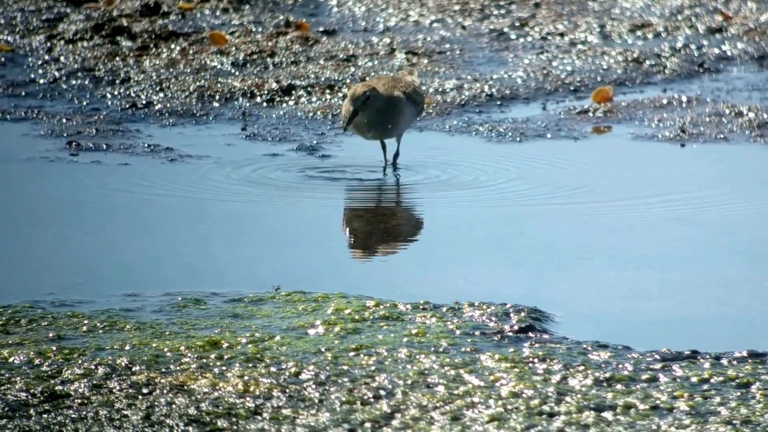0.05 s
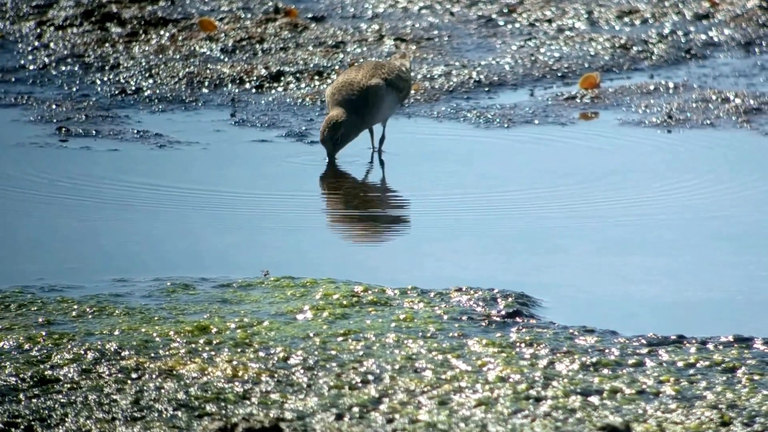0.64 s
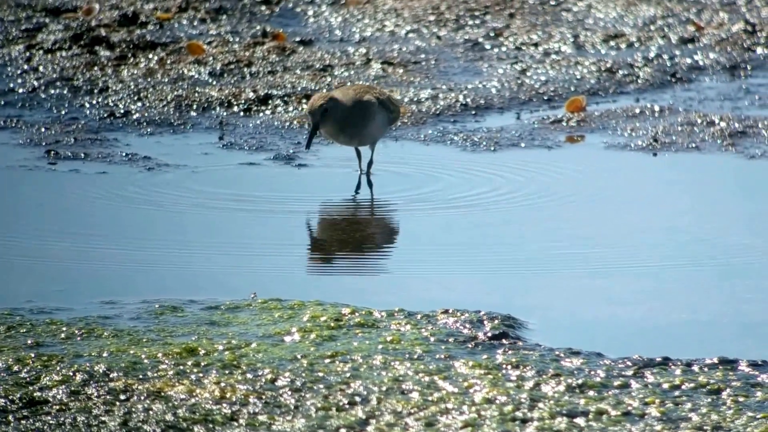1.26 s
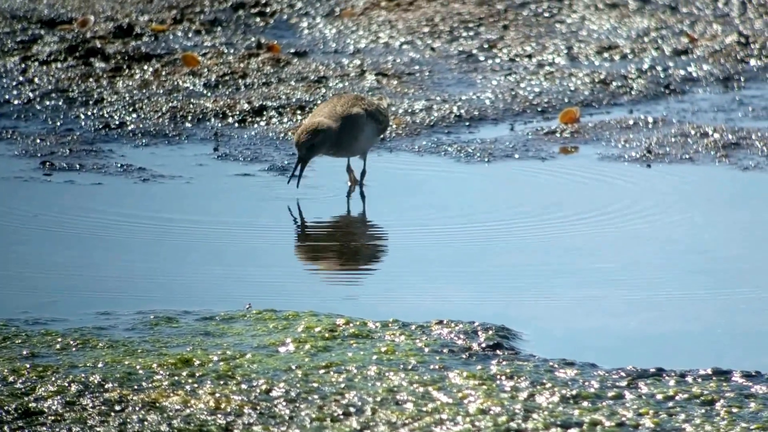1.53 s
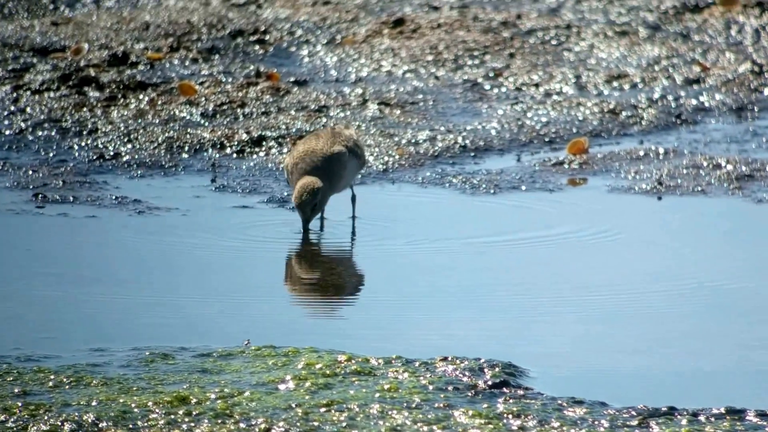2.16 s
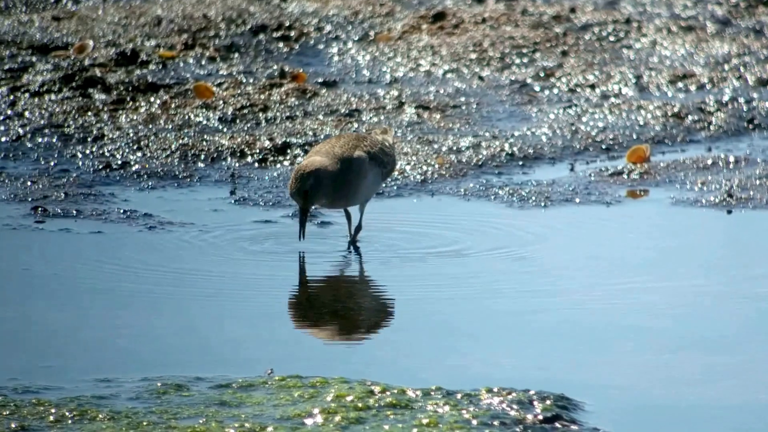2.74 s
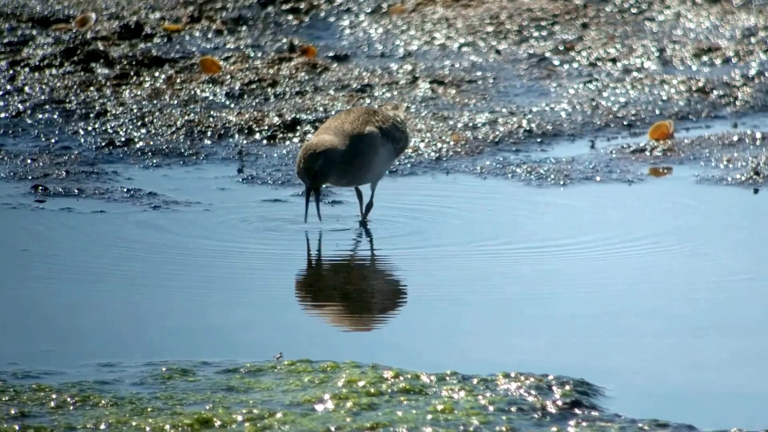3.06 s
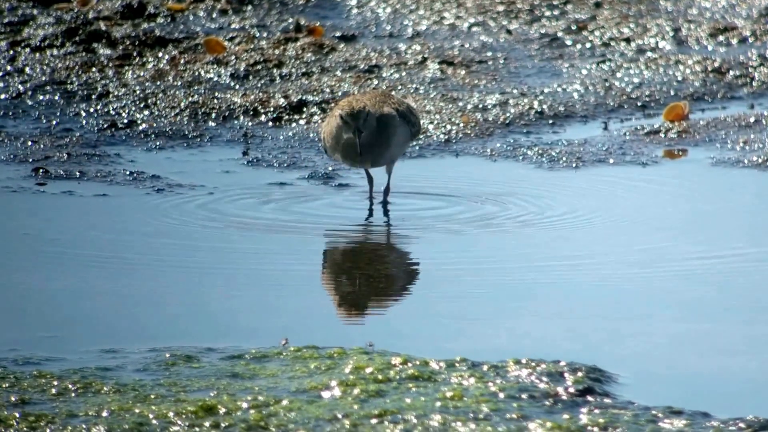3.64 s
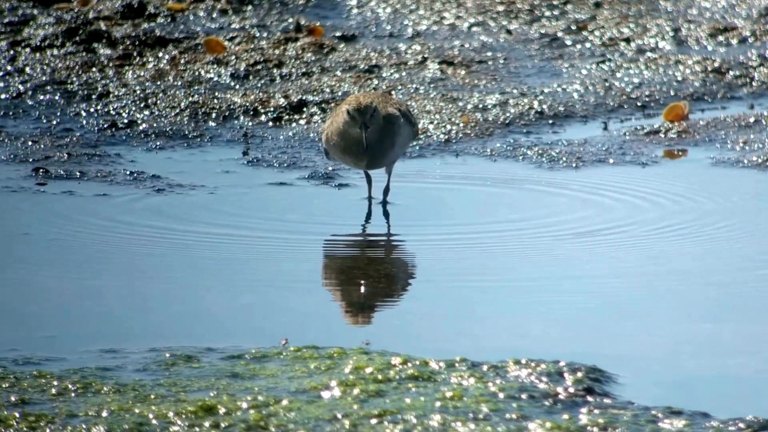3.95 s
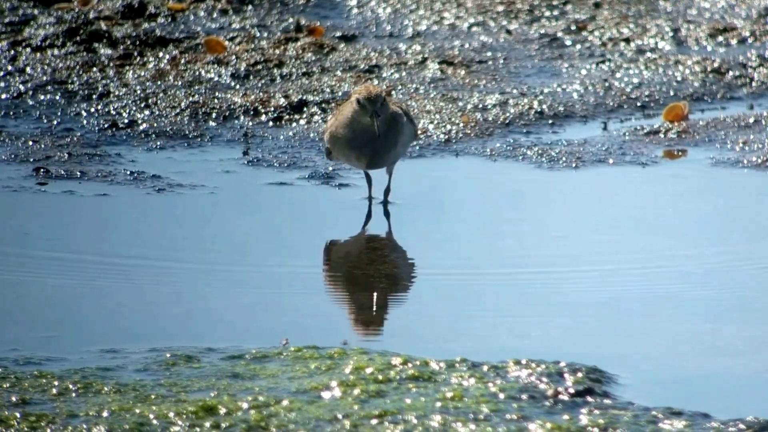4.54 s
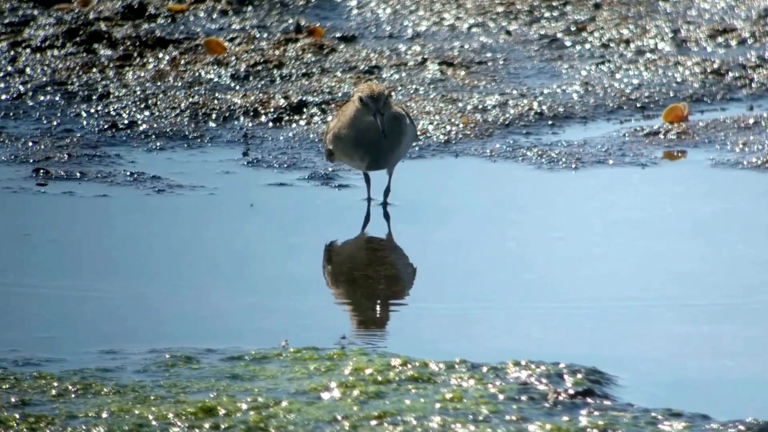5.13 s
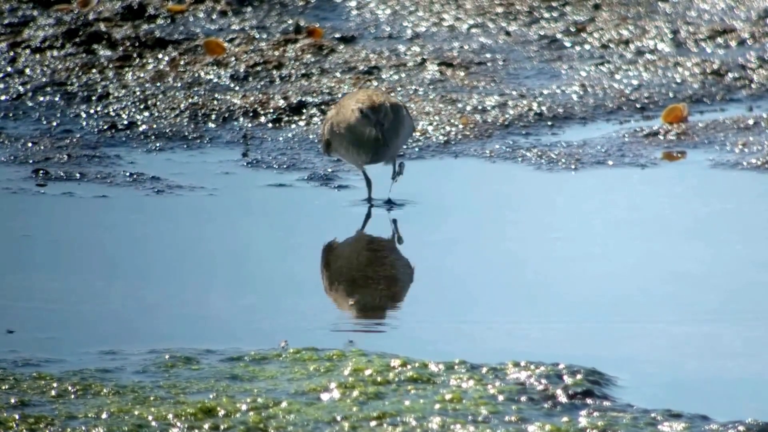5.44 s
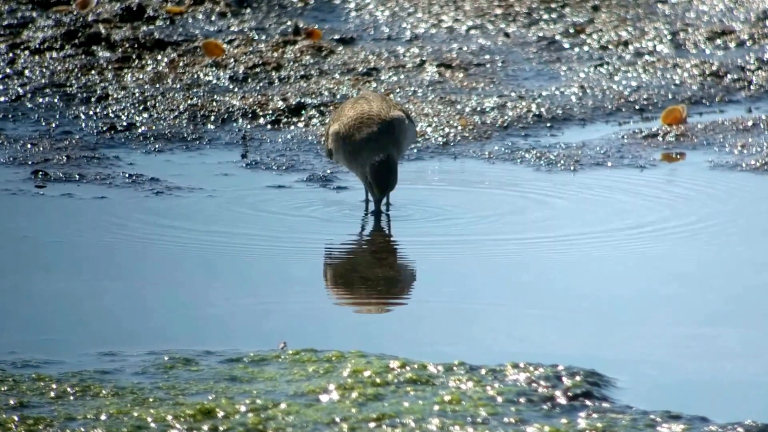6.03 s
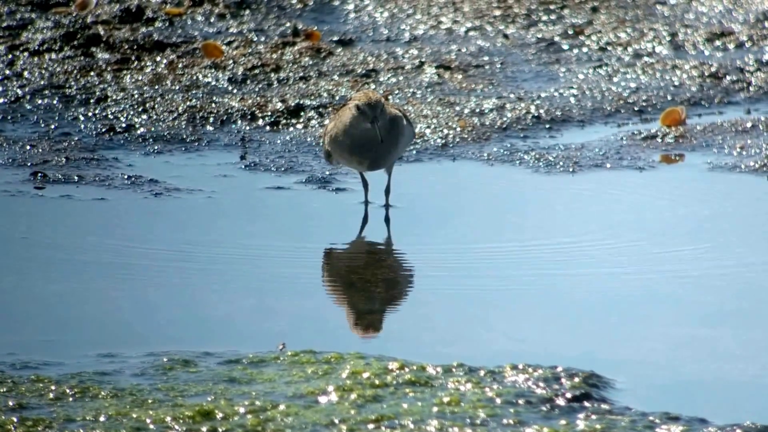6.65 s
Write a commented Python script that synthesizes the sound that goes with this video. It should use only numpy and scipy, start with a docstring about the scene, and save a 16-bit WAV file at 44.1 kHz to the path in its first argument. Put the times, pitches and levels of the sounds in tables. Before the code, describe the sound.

Quiet ambience at a shallow waterside near a road, heard through a small microphone with a light hiss. At first a car's tyres fade away under thin, dry grasshopper chirps, a few dull knocks and sharp little clicks. Brief swishes of clothing follow, over faint insects and far traffic. In the last seconds a second car swells closer, its exhaust droning and its tyres sounding slightly hollow.

```python
"""A muddy shore near a road, with far traffic rumbling and insects shimmering faintly throughout.
At first a car drives off while a grasshopper rasps with its legs, among soft bumps and a few ticks.
Then a sleeve swishes now and then, and the grasshopper adds four longer strokes. Another car draws
near and is loudest at the end, its exhaust droning, its tyre noise hollowed by the ground reflection.
All of it reaches a small microphone that rings near 8 kHz."""
import sys
import numpy as np
from scipy import signal
from scipy.fft import rfft, irfft
from scipy.io import wavfile
from scipy.ndimage import map_coordinates

SR = 44100
rng = np.random.default_rng(int(sys.argv[2]) if len(sys.argv) > 2 else 0)


def transcribe(u):
    """Save the signal u as a 16-bit wav file named by the first command-line argument.

    u: samples, shape (n,) or (channels, n), limited to [-1, 1]; the rate is SR.
    q: integer samples, one column per channel.
    """
    v = np.clip(np.atleast_2d(u).T, -1, 1)
    q = np.round(v * 32767).astype(np.int16)
    wavfile.write(sys.argv[1], SR, q)


N = 299439
TIME = np.arange(N) / SR


def from_db(db):
    """Decibels to gain."""
    return 10 ** (np.asarray(db) / 20)


def unit_power(x):
    """Scale to unit power."""
    return x / np.sqrt(np.mean(x ** 2) + 1e-20)


def curve(rows):
    """Join (seconds, value) points with straight lines, at every sample."""
    return np.interp(TIME, *np.transpose(rows))


def since(s):
    """Seconds gone by after a moment, zero before it."""
    return np.maximum(TIME - s, 0)


def swell(peak_s, length_s):
    """A smooth rise and fall of height 1 around a moment."""
    return np.exp(-(2 * (TIME - peak_s) / length_s) ** 2)


def drift(rate_hz):
    """Slow random wander of spread 1."""
    hz = np.fft.rfftfreq(N, 1 / SR)
    return unit_power(irfft(rfft(rng.standard_normal(N)) / (1 + (hz / rate_hz) ** 4), N))


def flutter(depth_db, rate_hz):
    """A gain that wavers at random."""
    return from_db(depth_db * drift(rate_hz))


def noise(colour):
    """Noise of unit power with the given colour, falling steeply past both ends."""
    hz = np.fft.rfftfreq(N, 1 / SR) + 1e-3
    points_hz, level_db = np.transpose(colour)
    gain = from_db(np.interp(np.log(hz), np.log(points_hz), level_db))
    gain *= np.minimum(1, hz / points_hz[0]) ** 2 * np.minimum(1, points_hz[-1] / hz) ** 2
    return unit_power(irfft(rfft(rng.standard_normal(N)) * gain, N))


def sliding_noise(colour, ratio):
    """Noise whose peaks and notches slide by a ratio, as a changing ground reflection makes them."""
    position = np.cumsum(ratio) % (N - 1)
    return map_coordinates(noise(colour), [position], order=3, mode="wrap")


def passing(loudest_s, half_width_s, db, loss_db):
    """Gain of a source driving by on a straight road, losing loss_db per tenfold distance."""
    distance = np.hypot(1, (TIME - loudest_s) / half_width_s)
    return from_db(db - loss_db * np.log10(distance))


def notch(x, centre_hz, depth, width_hz):
    """Cancel a share of the band around a moving centre."""
    carrier = np.exp(2j * np.pi * np.cumsum(centre_hz) / SR)
    band = signal.sosfiltfilt(signal.butter(1, width_hz / 2, fs=SR, output="sos"), x / carrier)
    return x - np.clip(depth, 0, 1) * 2 * np.real(band * carrier)


# A nearly flat hiss. Each row: frequency in Hz, relative level in dB.
HISS_COLOUR = [(500, -2), (2000, -3), (3200, -5), (4500, -8), (6000, -7), (7200, -4), (8200, -6),
               (10000, -4.5), (13000, -5.5), (15700, -6.5)]

def noise_floor(whine_hz=15000):
    """A steady faint hiss and the thin whine of the camera."""
    hiss = from_db(-62.8) * noise(HISS_COLOUR) * flutter(depth_db=.45, rate_hz=50)
    whine = from_db(-88) * np.sin(2 * np.pi * whine_hz * TIME)
    return hiss + whine


# The ebb and flow of the far insects. Each row: time in seconds, level in dB.
CHORUS_LEVEL = [(0, -70.5), (1.8, -64), (2.85, -60), (3.1, -69.5), (4.9, -62.5), (5.7, -77), (6.5, -64.5)]
# Their high sheen. Each row: frequency in Hz, relative level in dB.
CHORUS_COLOUR = [(3000, -28), (5500, -5), (6600, -7), (7300, -1.5), (8000, -1), (8800, -8.5), (9700, -8),
                 (11000, -21), (14000, -22)]

def insect_chorus():
    """Many far insects blur into one shimmering band."""
    return from_db(curve(CHORUS_LEVEL)) * noise(CHORUS_COLOUR) * flutter(depth_db=2.14, rate_hz=39)


# A thin, dry rasp. Each row: frequency in Hz, relative level in dB.
RASP_COLOUR = [(6000, -16), (7400, -7.5), (8100, 3), (8600, -1), (9100, -5), (9800, -12), (12000, -17),
               (15000, -22)]
# The longer single strokes. Each row: peak time in seconds, length in seconds, level in dB.
LONG_STROKES = [(4.474, 0.13, -57.5), (4.616, 0.13, -54.5), (5.28, 0.15, -62.5), (5.455, 0.33, -61.5)]

def grasshopper(gap_s=.1285, gap_shrink_s=.0016, stroke_s=.058, tooth_hz=130):
    """Each chirp is one leg stroke; the opening run quickens a little and swells towards its middle."""
    stroke = np.arange(15)
    times = .272 + stroke * (gap_s - gap_shrink_s * stroke / 2)
    run = [(s, stroke_s, -62.5 - 3.5 * abs(s - 1.17)) for s in times]
    envelope = sum(from_db(db) * swell(s, length) for s, length, db in run + LONG_STROKES)
    return envelope * noise(RASP_COLOUR) * flutter(depth_db=3.5, rate_hz=tooth_hz)


# Soft knocks. Each row: start in seconds, level in dB, decay in seconds.
BUMPS = [(0.113, -46.5, .012), (.687, -49.5, 0.05), (1.907, -41, 0.0073)]
# Their muffled thud. Each row: frequency in Hz, relative level in dB.
BUMP_COLOUR = [(120, -4), (230, -0.5), (380, -6.5), (560, -5.5), (900, -16), (2000, -31)]

def bumps():
    """Dull, quickly damped knocks on the camera body."""
    envelope = sum(from_db(db) * (TIME > s) * np.exp(-since(s) / decay) for s, db, decay in BUMPS)
    return envelope * noise(BUMP_COLOUR)


# Sharp little clicks. Each row: start in seconds, strength of the contact in dB.
TICKS = [(0.687, -30.5), (.733, -54), (.933, -46), (3.585, -50), (4.547, -38)]
# Their bright ring. Each row: frequency in Hz, relative level in dB, seconds to fall by 60 dB.
TICK_MODES = [(4060, -13, 0.0037), (5680, -11, 0.0068), (7700, -6, 0.0018), (8660, 0, 0.0021),
              (10600, -3, 0.0015)]

def ticks():
    """Tiny hard contacts, each dead within a few milliseconds."""
    age = TIME[:SR // 50]
    ring = sum(from_db(db - 60 * age / t60) * np.sin(2 * np.pi * hz * age) for hz, db, t60 in TICK_MODES)
    contacts = np.zeros(N)
    for s, db in TICKS:
        contacts[round(s * SR)] = from_db(db)
    return signal.fftconvolve(contacts, ring)[:N]


# Crisp cloth friction. Each row: frequency in Hz, relative level in dB.
CLOTH_COLOUR = [(1200, -6), (2200, -1), (3000, -8), (4100, 4.5), (4800, -2), (5600, -1), (7500, -3.5),
                (9000, -4), (11000, -7), (15000, -15)]
# Sleeve strokes. Each row: start, fastest moment and end in seconds, gain in dB,
# rise and fade in seconds, low and high band edge in Hz.
SWISHES = [(1.72, 1.875, 1.95, -56.5, 0.062, 0.043, 3900, 11000),
           (3.18, 3.338, 3.375, -43.5, 0.06, 0.015, 1500, 13500),
           (3.35, 3.48, 3.6, -59, .8, .8, 3400, 11000), (4.346, 4.5, 4.7, -58.5, 0.35, 0.73, 3300, 9200),
           (4.524, 4.625, 4.71, -47, 0.066, 0.069, 4270, 8100)]

def sleeve(edge_s=.0084):
    """Cloth slides faster, then stops; the weave catches and makes the hiss grainy."""
    out = np.zeros(N)
    for start, fastest, end, db, rise, fade, low_hz, high_hz in SWISHES:
        speed = np.exp(-np.maximum((fastest - TIME) / rise, (TIME - fastest) / fade))
        contact = np.clip(np.minimum(TIME - start, end - TIME) / edge_s, 0, 1)
        band = signal.butter(3, [low_hz, high_hz], "band", fs=SR, output="sos")
        friction = signal.sosfilt(band, noise(CLOTH_COLOUR))
        out += from_db(db) * speed * contact * friction
    return out * flutter(depth_db=1.5, rate_hz=370)


# The road bed: deep rumble, body roar and tyre hum. Each row: frequency in Hz, relative level in dB.
RUMBLE_COLOUR = [(20, -15), (32, -20), (42, -7), (50, 3.5), (65, 4.5), (80, -3.5), (100, -1), (130, -7),
                 (170, -12.5), (230, -22.5), (400, -29)]
ROAR_COLOUR = [(70, -28), (120, -2.5), (180, 1.5), (250, 1), (340, -0.5), (470, 2.5), (640, -2.5), (820, 0),
               (1100, -11.5), (1500, -14)]
HUM_COLOUR = [(350, -24), (580, -12.5), (740, -2.5), (900, -0.5), (1100, 1), (1250, -5), (1500, -8.5),
              (1750, -12), (2200, -21), (3150, -17.5), (3700, -25.5), (4200, -28.5), (4700, -30),
              (5200, -34), (8000, -40.5)]
LEAVE_S = 1.42   # the leaving car's tyres hold their level until here

def traffic():
    """The far road and both cars add up to rumble, roar and hum, wavering in the moving air."""
    def layer(colour, far_db, leaving_db, nearing):
        power = from_db(far_db) ** 2 + from_db(leaving_db) ** 2 + nearing ** 2
        return np.sqrt(power) * noise(colour)

    low_fade_db, hum_fade_db = 3 * TIME, 5.5 * since(LEAVE_S)
    # Each part of the nearing car beams at the shore at its own moment.
    rumble = layer(RUMBLE_COLOUR, far_db=-54.5, leaving_db=-48 - low_fade_db,
                   nearing=passing(7, 1.4, db=-41.5, loss_db=23))
    roar = layer(ROAR_COLOUR, far_db=-65, leaving_db=-58.5 - low_fade_db,
                 nearing=passing(6.5, .7, db=-41.5, loss_db=36))
    hum = layer(HUM_COLOUR, far_db=-56.5, leaving_db=-49.5 - hum_fade_db,
                nearing=passing(6, .6654, db=-43, loss_db=25))
    return rumble * flutter(depth_db=.5, rate_hz=6.4) + roar + hum * flutter(depth_db=.6, rate_hz=11.5)


# The leaving car's tread noise. Each row: frequency in Hz, relative level in dB.
LEAVING_TREAD_COLOUR = [(350, -30), (520, -3), (750, -30), (1100, 0), (1350, 5), (1700, 0), (2150, -10),
                        (2550, -6), (2900, -10), (3200, -11), (3700, -38)]

def leaving_tyres(climb_per_s=.08, fade_db_per_s=48):
    """The tyre colour climbs as the car draws off; the level holds, then fades."""
    tread = sliding_noise(LEAVING_TREAD_COLOUR, ratio=.94 + climb_per_s * TIME)
    level_db = -55 - fade_db_per_s * since(LEAVE_S)
    return from_db(level_db) * tread * flutter(depth_db=2.5, rate_hz=13)


# Singing patches of road. Each row: peak time and length in seconds, level in dB,
# centre in Hz, glide in Hz per second.
TYRE_SONGS = [(0.032, 0.31, -47, 1000, 92), (0.983, 0.35, -49, 1080, 99), (1.311, 0.24, -53, 1720, 1000),
              (5.48, 0.75, -53, 1225, -400), (6.029, 0.8, -47.5, 1057, -100),
              (6.408, 0.45, -50, 1680, -300)]

def tyre_song(width_hz=280):
    """Tyres sing over patches of road: narrow, almost pitched bands of noise that swell and glide."""
    band = drift(width_hz / 2) + 1j * drift(width_hz / 2)
    out = np.zeros(N)
    for s, length, db, centre_hz, glide in TYRE_SONGS:
        carrier = np.exp(2j * np.pi * np.cumsum(centre_hz + glide * (TIME - s)) / SR)
        out += from_db(db) * swell(s, length) * np.real(band * carrier)
    return out


# The nearing car's tread noise and its fine spray of treble, combed by the ground reflection.
# Each row: frequency in Hz, relative level in dB.
NEARING_TREAD_COLOUR = [(700, -42), (1080, -2.5), (1250, 0.5), (1450, 2), (1700, -2.5), (2000, -5),
                        (2350, -7), (2700, -19), (3200, -51)]
SPRAY_COLOUR = [(2000, -3), (2650, 3), (2950, -0.5), (3200, 4.5), (3450, -2), (3780, -43), (4150, -0.5),
                (4620, -18), (5100, -4.5), (5750, -14), (6500, -6.5), (8000, -8.5), (11000, -23)]

def nearing_tyres(sink_from_s=6.1, sink_per_s=.08):
    """The tyres brighten as the air takes less treble; their colour sinks as the car draws level."""
    ratio = 1.025 - sink_per_s * since(sink_from_s)
    tread = passing(6, 1.09, db=-52, loss_db=37.5) * sliding_noise(NEARING_TREAD_COLOUR, ratio)
    spray = passing(6.5, 1, db=-52, loss_db=76) * sliding_noise(SPRAY_COLOUR, ratio)
    return tread * flutter(depth_db=1.5, rate_hz=12) + spray


# The main hollow moves with the cars. Each row: time in seconds, centre in Hz.
NOTCH_PATH = [(0, 2060), (2.0, 2200), (4.8, 2800), (5.95, 3000), (6.79, 2330)]
# It deepens while one car stands out. Each row: peak time and length in seconds, depth from 0 to 1.
NOTCH_SPELLS = [(1.25, 2.1, 0.6), (5.7, 2.4, 0.86)]

def ground_reflection(road, low_hz=1360):
    """The wave off the mud cancels the direct one in a moving notch and a lower, steady one."""
    low_depth = .95 * swell(peak_s=6.8, length_s=.79)   # opens when the car is closest
    hollowed = notch(road, np.full(N, low_hz), low_depth, width_hz=260)
    main_depth = sum(depth * swell(s, length) for s, length, depth in NOTCH_SPELLS)
    return notch(hollowed, curve(NOTCH_PATH), main_depth, width_hz=570)


# The pitch of the nearing car's engine. Each row: time in seconds, firing rate in Hz.
FIRING_RATE = [(0, 81.7), (2.1, 82.62), (5.4, 85.83), (6.25, 84.5), (6.79, 81.2)]

def exhaust(rise_db_per_s=2.5, fall_db_per_s=28, far_octave_db=-67.5):
    """From afar only the firing rate and its octave carry; the octave takes over as the car draws level."""
    phase = 2 * np.pi * np.cumsum(curve(FIRING_RATE)) / SR
    duck_db = rise_db_per_s * np.maximum(3.9 - TIME, 0) + fall_db_per_s * since(6.4)
    drone_gain = passing(6.5, 1.1, db=-38, loss_db=19) * from_db(-duck_db)
    octave_gain = np.hypot(from_db(far_octave_db), passing(6.75, .16, db=-37.5, loss_db=32))
    drone = drone_gain * np.sin(phase) * flutter(depth_db=.46, rate_hz=5.3)
    octave = octave_gain * np.sin(2 * phase) * flutter(depth_db=1.1, rate_hz=6.4)
    return np.sqrt(2) * (drone + octave)


def scene():
    """Hiss and insects at the back, small sounds up close, and the road over them, in mono."""
    background = noise_floor() + insect_chorus() + grasshopper()
    close = bumps() + ticks() + sleeve()
    road = ground_reflection(traffic() + leaving_tyres() + tyre_song() + nearing_tyres())
    return (background + close + road + exhaust())[None]


def record(dry, port_hz=7960, port_width_hz=1480, port_gain=2.67, cutoff_hz=15800):
    """The cavity of the microphone port rings in the treble; the top is cut."""
    b, a = signal.iirpeak(port_hz, port_hz / port_width_hz, fs=SR)
    coloured = dry + port_gain * signal.lfilter(b, a, dry)
    return signal.sosfilt(signal.ellip(12, .1, 80, cutoff_hz, fs=SR, output="sos"), coloured)


dry = scene()
out = record(dry)
transcribe(out)
```